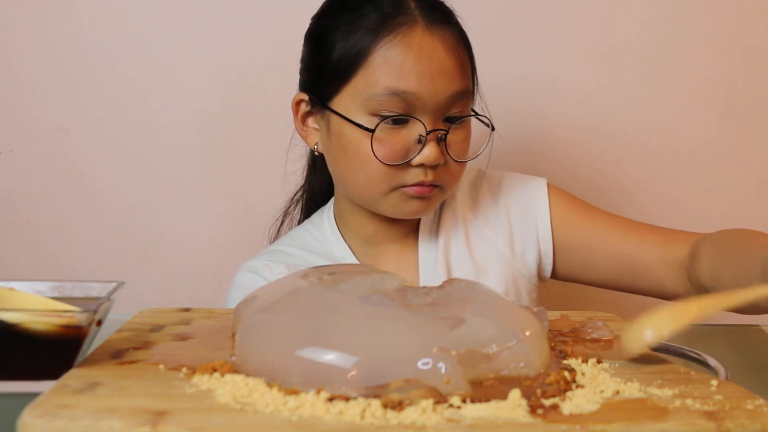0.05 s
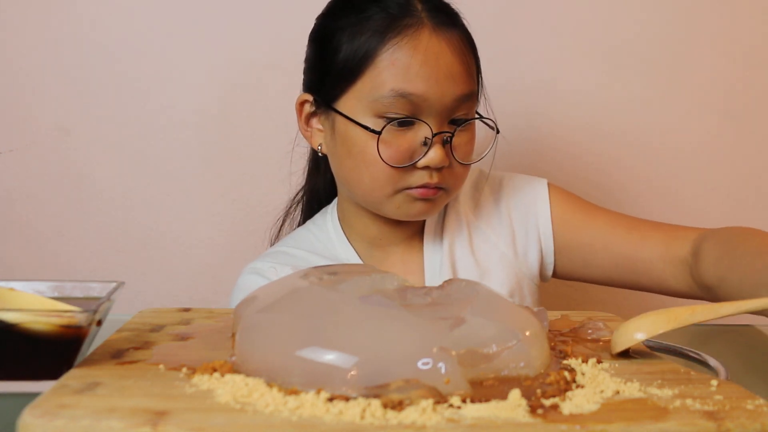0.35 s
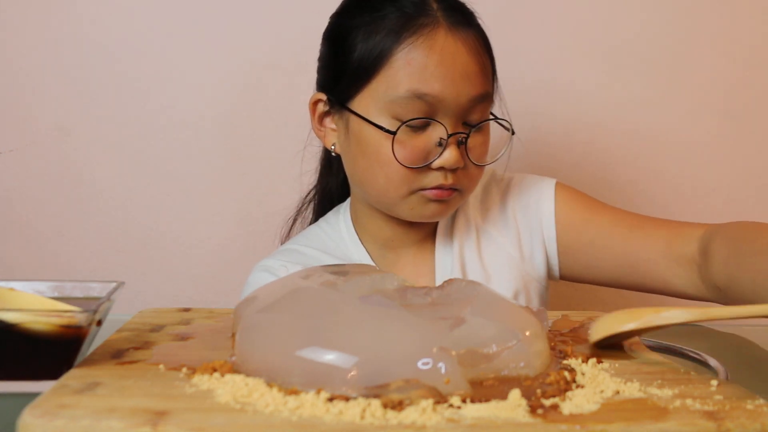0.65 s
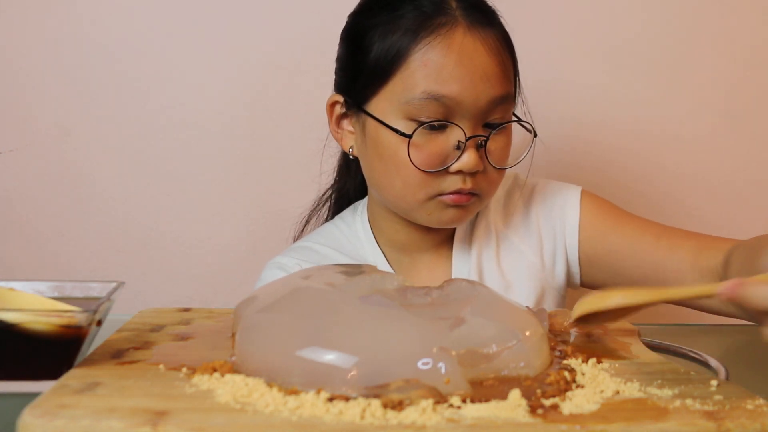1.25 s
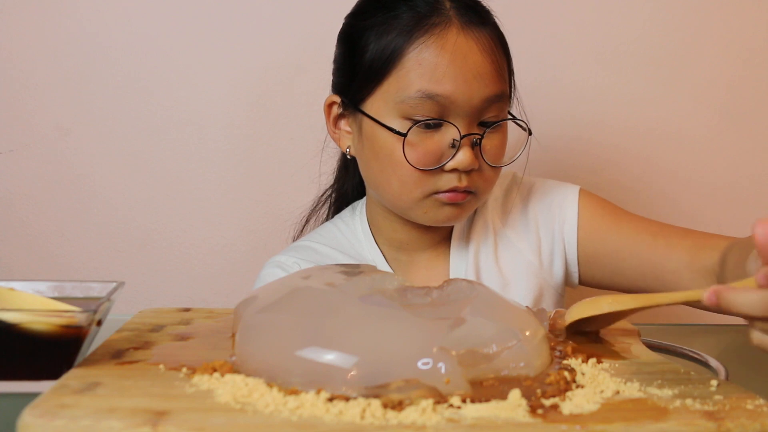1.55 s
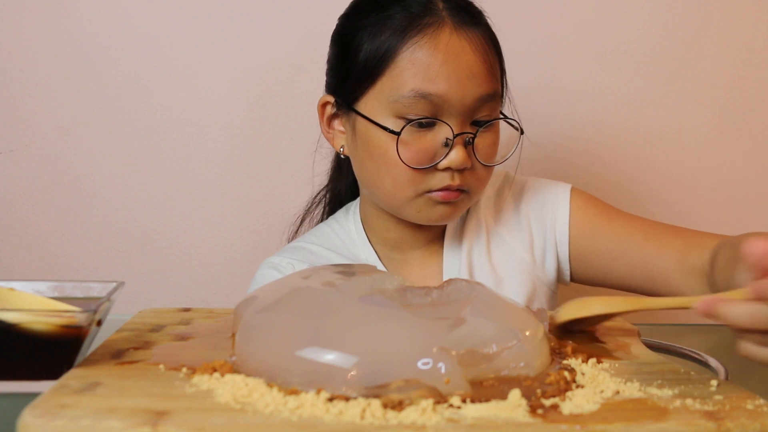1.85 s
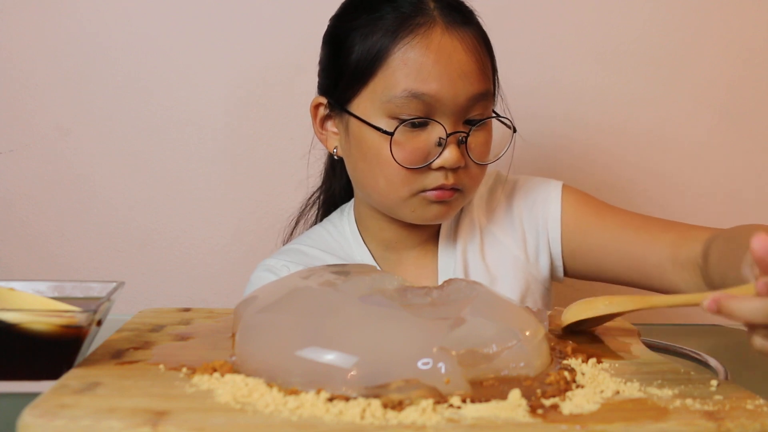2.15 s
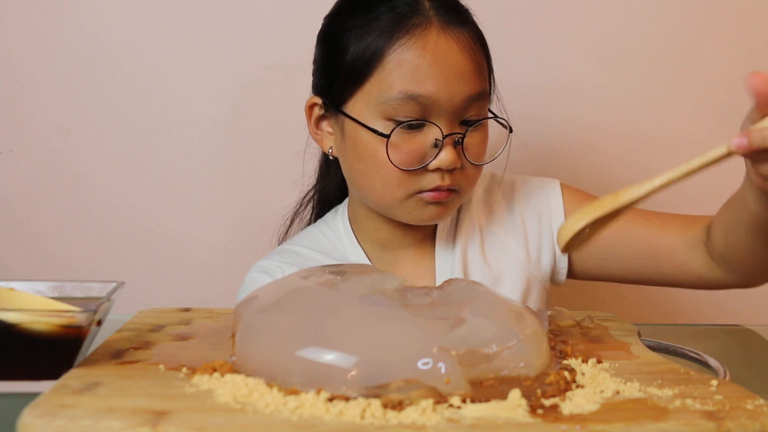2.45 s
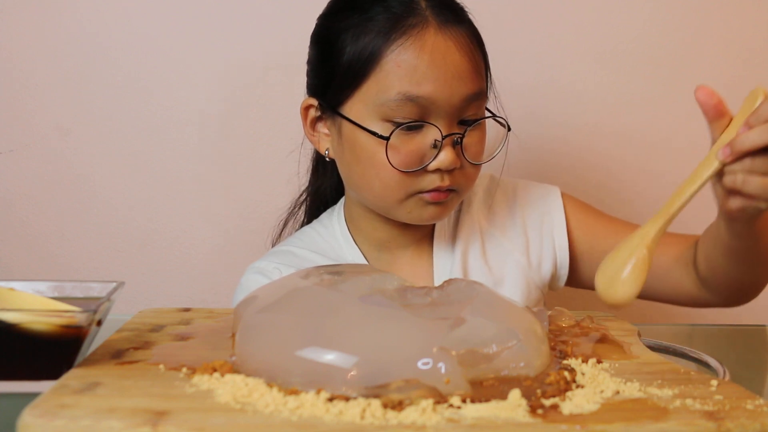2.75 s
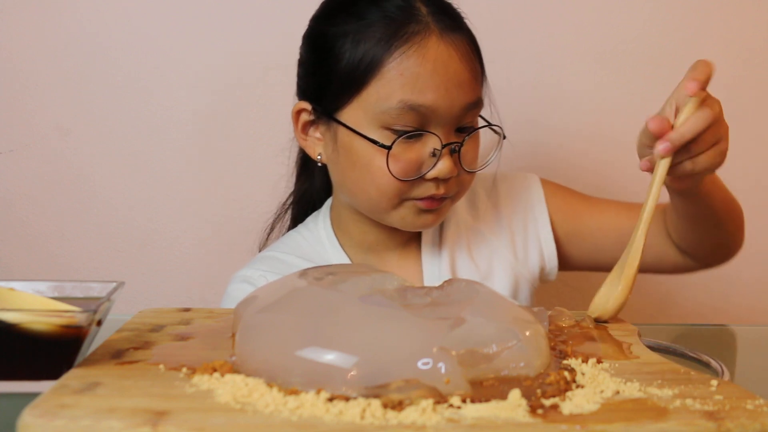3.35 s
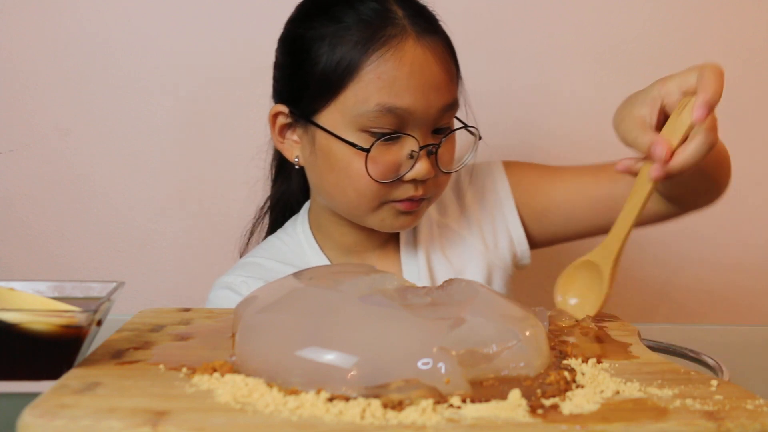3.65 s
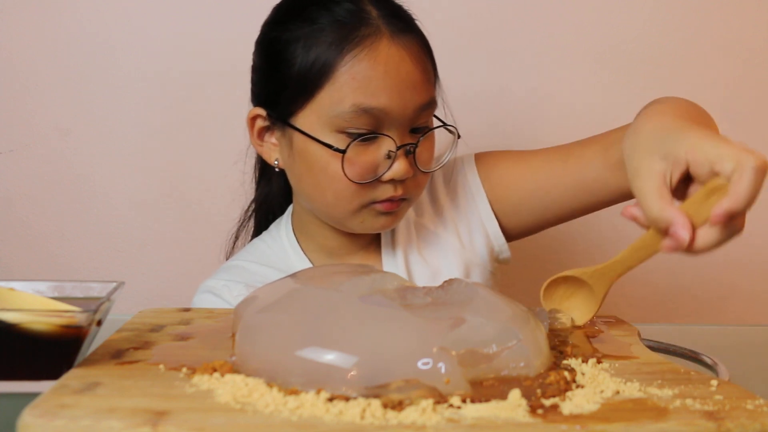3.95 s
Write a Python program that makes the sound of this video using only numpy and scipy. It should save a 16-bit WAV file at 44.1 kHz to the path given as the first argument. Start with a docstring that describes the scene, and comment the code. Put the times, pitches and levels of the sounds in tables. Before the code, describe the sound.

Close up in a small, quiet kitchen, a wooden spoon taps and rubs on a wooden board, now and then squeaking. It lifts with a soft rustle, lands with a firm knock, then makes a few faint touches.

```python
"""Wooden spoon on a wooden board

A small, quiet kitchen, microphone close, nearly mono. The spoon knocks on the board, ringing both, and
is pushed over it in short, gritty strokes that now and then stick and squeak. It is lifted with a soft
rustle, set down hard, creaks and slides in the fingers, and touches the board again. The room answers."""
import sys
import numpy as np
from scipy import signal
from scipy.fft import rfft, irfft, next_fast_len
from scipy.io import wavfile
from scipy.ndimage import uniform_filter1d, map_coordinates

SR = 44100
rng = np.random.default_rng(int(sys.argv[2]) if len(sys.argv) > 2 else 0)


def master_out(mix):
    """Clip the mix to full scale and print it as 16-bit PCM to the path in sys.argv[1]."""
    frames = np.transpose(np.atleast_2d(mix))
    ceiling = np.clip(frames, -1, 1)
    pcm = np.round(ceiling * 32767).astype(np.int16)
    wavfile.write(sys.argv[1], SR, pcm)


N = 176400

# spoon meets board: start_s, peak_db, hardness_hz, spoon_ping_db, spot_hz, spot_gain
KNOCKS = [(.1418, 0, 2550, -13.5, 1390, 1), (1.0946, -10.5, 1850, -53, 804, .4),
          (1.458, -1, 2760, -38, 2790, 1.1), (1.897, -17, 1400, -37, 1010, 1.5),
          (2.9425, -1, 1040, -25, 754, 0.5), (2.9495, -6, 1370, -47, 994, 3.5),
          (3.304, -15.5, 730, -47, 435, 0.74), (3.762, -31, 784, -52, 690, 1.1),
          (3.91, -26, 725, -37, 710, .6)]
# pushes over the board, levels ahead of the trims in scrapes(): start_s, length_s, rub_db, rumble_db, rasp_db
STROKES = [(0.643, 0.14, -35, -36, -42.5), (0.759, 0.088, -21, -49, -34), (1.128, 0.066, -22, -32, -30.5),
           (1.177, 0.045, -20, -30, -29.5), (1.227, .08, -58, -45, -59), (1.319, 0.053, -57, -49, -47),
           (1.477, 0.15, -22, -33.5, -32), (1.614, .1, -34.5, -58, -38), (1.703, 0.067, -32, -35, -36.5),
           (1.824, 0.12, -19, -35.5, -26), (1.971, 0.12, -22.5, -32.5, -30), (2.123, 0.096, -22, -32, -28),
           (3.02, 0.13, -32.5, -40, -52), (3.603, 0.15, -38, -35.5, -67), (3.914, 0.041, -42.5, -31, -51)]
# the wood sticks and slips in step: start_s, length_s, pitch_hz, relative_db
SQUEAKS = [(0.794, 0.062, 1075, -24), (1.174, 0.038, 926, -17), (1.255, 0.045, 925, -38),
           (1.848, 0.065, 1009, -14.5), (2.134, 0.048, 1052, -19.5)]
# the handle creaks in the grip: start_s, length_s, level_db
CREAKS = [(2.969, 0.005, -32), (2.9992, 0.0043, -23.5), (3.004, 0.0026, -23), (3.015, 0.0042, -23.5),
          (3.0435, .0025, -19), (3.066, .003, -32)]
# faint ticks of the spoon: start_s, peak_db
TICKS = [(2.902, -28.5), (2.91, -43), (3.0458, -17), (3.491, -36.5)]
# the handle slides through the fingers: start_s, length_s, level_db
SLIDES = [(3.177, 0.069, -43), (3.235, 0.22, -47)]
# the arm moves: start_s, length_s, level_db
RUSTLES = [(-.1, 0.31, -51), (1.254, 0.054, -46), (1.91, 0.37, -45), (2.207, 0.25, -42), (2.427, 0.13, -43),
           (2.535, .14, -44), (3.607, 0.12, -47)]
# broad, quickly damped modes of the board: pitch_hz, width_hz, gain_db
BOARD_MODES = [(310, 140, 4), (508, 124, 4), (837, 280, 9.5), (1051, 65, 5), (1253, 660, 1), (1667, 265, 2),
               (2500, 140, 7.5)]
# modes of the spoon: pitch_hz, width_hz, gain_db
SPOON_MODES = [(2590, 290, 4.5), (3670, 370, -9), (4750, 130, 3), (5070, 150, 1.5), (6280, 170, -8.5),
               (11800, 4300, -26)]
# midrange of wood rubbing on wood: frequency_hz, relative_db
RUB_SPECTRUM = [(150, -37), (340, -12.5), (500, -8.5), (750, -5), (940, 0), (1080, -3), (1260, -5),
                (1500, -12), (1800, -13), (2200, -26), (3000, -48), (6000, -32)]
# low rumble under a stroke: frequency_hz, relative_db
RUMBLE_SPECTRUM = [(70, -67), (160, -12), (300, -1.5), (500, 0.5), (750, -7.5), (1500, -48)]
# dry rasp on top of a stroke: frequency_hz, relative_db
RASP_SPECTRUM = [(1200, -19), (2150, -9), (2600, 0.5), (3300, -4), (4100, -14.5), (4800, -13), (5700, -24),
                 (6700, -19), (8000, -28), (11200, -36), (12400, -27), (13500, -40)]
# fingers on the handle: frequency_hz, relative_db
FINGER_SPECTRUM = [(2500, -47), (4300, -18), (4850, -1.5), (5500, -23), (6800, -19), (8500, -18.5),
                   (11000, -29), (16000, -29)]
# cloth on the moving arm: frequency_hz, relative_db
CLOTH_SPECTRUM = [(600, -13), (1500, -7.5), (2600, 2.5), (4500, -4.5), (6200, -2), (9500, -11),
                  (12000, -19.5), (16000, -29)]
# echoes off the table and near surfaces: delay_s, gain
NEAR_ECHOES = [(.0023, 0.088), (.004, 0.09), (.0062, 0.36), (.0074, 0.19), (.0102, 0.42), (0.0128, 0.22)]
# lingering resonances of table and kitchen: pitch_hz
LINGER_HZ = [152, 312, 363, 476, 509, 675, 755, 788, 927, 1046, 1212, 1279, 1452, 1644, 1771]
# strength of each of those resonances: gain_db
LINGER_DB = [1, 2, 2, 6, 5, 2, 3, 3, 7, 6, 4, 4, 0, 1, 1]
# time the kitchen takes to die away by 60 dB: frequency_hz, decay_s
ROOM_DECAY = [(200, 0.98), (550, 0.88), (1400, 0.32), (3700, .38), (12000, 0.083)]
# room tone of the kitchen: frequency_hz, relative_db
ROOM_TONE_SPECTRUM = [(15, -41), (25, -19), (184, 0.5), (228, 0.5), (291, -3), (382, -1.5), (672, -8.5),
                      (729, -10), (881, -8.5), (1090, -11), (1180, -12.5), (1430, -16), (1930, -17),
                      (2590, -17), (4570, -20.5), (5980, -21.5), (15800, -30.5)]
# microphone hiss: frequency_hz, relative_db
HISS_SPECTRUM = [(100, 6), (600, -7), (2500, -13), (5000, -7.5), (9000, 4.5), (16000, 5.5)]


def knocks(spot_width_hz=170, bass_cut_hz=240, bend_delay_s=0.000502):
    """Each knock thumps the board, coloured by the spot it strikes; the board radiates little bass."""
    out = np.zeros(N)
    for start_s, peak_db, hardness_hz, _, spot_hz, spot_gain in KNOCKS:
        def struck_board(hz):
            spot = 1 + spot_gain * modes([(spot_hz, spot_width_hz, 0)], hz)
            # bending waves reach the edge after bend_delay_s at 1 kHz, the bass later still
            travel = np.exp(-4j * np.pi * bend_delay_s * np.sqrt(1000 * hz))
            radiation = (1j * hz / (bass_cut_hz + 1j * hz)) ** 2
            return board(hz) * spot * travel * radiation
        out += amp(peak_db) * strike(start_s, struck_board, hardness_hz)
    return out


def pings(lag_s=0.00071):
    """Each knock also rings the spoon, briefly: the hand damps it."""
    return sum(amp(ping_db) * strike(start_s + lag_s, spoon, hardness_hz=5600)
               for start_s, _, _, ping_db, _, _ in KNOCKS)


def strike(start_s, body, hardness_hz):
    """One contact rings a body, at peak 1; softer contacts lose the treble."""
    softening = signal.butter(3, hardness_hz, fs=SR, output="sos")
    push = signal.sosfilt(softening, signal.unit_impulse(SR // 10))
    ring = filtered(push, body)
    return np.pad(ring / np.abs(ring).max(), (round(start_s * SR), N))[:N]


def board(hz):
    """Response of the board's modes."""
    return modes(BOARD_MODES, hz)


def spoon(hz):
    """Response of the spoon's modes."""
    return modes(SPOON_MODES, hz)


def scrapes(rub_trim_db=-6, rumble_trim_db=-5, rasp_trim_db=-4, uneven_db=1.05):
    """Slips drive the board's modes, with a rumble below and a dry rasp above."""
    rub = amp(rub_trim_db) * coloured(filtered(slips(), board), RUB_SPECTRUM)
    rumble = amp(rumble_trim_db) * coloured(slips(), RUMBLE_SPECTRUM)
    rasp = amp(rasp_trim_db) * coloured(slips(), RASP_SPECTRUM)
    out = np.zeros(N)
    for start_s, length_s, rub_db, rumble_db, rasp_db in STROKES:
        grit = amp(rub_db) * rub + amp(rumble_db) * rumble + amp(rasp_db) * rasp
        out += swell(start_s, length_s) * grit
    return out * amp(uneven_db * wobble(65))


def slips(per_s=2600, spread_db=5):
    """Dense tiny catches of wood on wood, uneven in size."""
    catches = rng.random(N) < per_s / SR
    sizes = amp(spread_db * rng.standard_normal(N))
    return catches * sizes * rng.choice([-1, 1], N)


def squeaks(waver=0.029, overtone_db=-22):
    """For a moment the slips lock to a resonance and make a rough tone."""
    phase_per_hz = 2 * np.pi * np.cumsum(1 + waver * wobble(250)) / SR
    out = np.zeros(N)
    for start_s, length_s, pitch_hz, relative_db in SQUEAKS:
        phase = pitch_hz * phase_per_hz
        tone = np.sin(phase) + amp(overtone_db) * np.sin(3 * phase)
        out += amp(relative_db) * swell(start_s, length_s) * tone
    return out / 2


def handling():
    """The handle creaks, ticks and slides as the fingers take a new grip."""
    creaks = swells(CREAKS) * unit_rms(filtered(rng.standard_normal(N), spoon))
    ticks = sum(amp(peak_db) * strike(start_s, spoon, hardness_hz=3740) for start_s, peak_db in TICKS)
    slides = swells(SLIDES) * coloured(rng.standard_normal(N), FINGER_SPECTRUM)
    return creaks + ticks + slides


def rustle(flutter_db=-1.2):
    """A faint brushing of cloth as the arm moves."""
    flutter = amp(flutter_db * wobble(60))
    return swells(RUSTLES) * flutter * coloured(rng.standard_normal(N), CLOTH_SPECTRUM)


def kitchen(x, linger_width_hz=11.3, echo_cut_hz=2250, tail_db=-2):
    """What reaches the microphone: direct sound, dull near echoes, lingering resonances, diffuse tail."""
    lingering = [(hz, linger_width_hz, db) for hz, db in zip(LINGER_HZ, LINGER_DB)]

    def near_field(hz):
        echoes = sum(gain * np.exp(-2j * np.pi * hz * delay_s) for delay_s, gain in NEAR_ECHOES)
        return 1 + modes(lingering, hz) + echoes / (1 + (hz / echo_cut_hz) ** 4)
    return filtered(x, near_field) + amp(tail_db) * room_tail(x)


def room_tail(x, build_s=0.001):
    """Diffuse reverberation of the kitchen, even in colour; the bass lasts longest."""
    length = SR // 2
    hz, t, noise = signal.stft(rng.standard_normal(length), SR, nperseg=256)
    decay = amp(-60 * t / curve_at(ROOM_DECAY, hz)[:, None])
    spectrum = rfft(signal.istft(noise * decay, SR, nperseg=256)[1], SR)
    colour = np.sqrt(np.abs(uniform_filter1d(np.abs(spectrum) ** 2, size=25)))
    build_up = 1 - np.exp(-(np.arange(length) / SR / build_s) ** 2)
    impulse = irfft(spectrum / colour)[:length] * build_up
    return signal.fftconvolve(x, impulse / np.linalg.norm(impulse))[:N]


def background(room_tone_db=-42.5, drift_db=0.3, hiss_db=-60):
    """Steady room tone in the centre, with separate microphone hiss on each side."""
    level = amp(room_tone_db + drift_db * wobble(5.25))
    room_tone = level * coloured(rng.standard_normal(N), ROOM_TONE_SPECTRUM)
    hiss = amp(hiss_db) * coloured(rng.standard_normal((2, N)), HISS_SPECTRUM)
    return room_tone + hiss


def amp(db):
    return 10 ** (np.asarray(db) / 20)


def unit_rms(x):
    return x / np.sqrt(np.mean(x ** 2) + 1e-20)


def curve_at(points, hz):
    """Interpolate (frequency_hz, value) points on a log frequency axis."""
    point_hz, values = np.transpose(points)
    return np.interp(np.log(hz + 1), np.log(point_hz + 1), values)


def filtered(x, response):
    """Pass x through a complex response of frequency."""
    length = x.shape[-1]
    padded = next_fast_len(length + SR // 2)
    hz = np.fft.rfftfreq(padded, 1 / SR)
    return irfft(rfft(x, padded) * response(hz), padded)[..., :length]


def coloured(x, spectrum):
    """Shape x by a spectrum, at rms 1."""
    return unit_rms(filtered(x, lambda hz: amp(curve_at(spectrum, hz))))


def modes(table, hz):
    """Summed response of damped resonances."""
    return sum(amp(gain_db) * 1j * hz * width_hz / (pitch_hz ** 2 - hz ** 2 + 1j * hz * width_hz)
               for pitch_hz, width_hz, gain_db in table)


def swell(start_s, length_s, rise_share=0.35, roundness=0.89):
    """A rounded rise and fall."""
    corners_s = [start_s, start_s + length_s * rise_share, start_s + length_s]
    arc = np.interp(np.arange(N) / SR, corners_s, [0, 1, 2])
    return np.abs(np.sin(arc * np.pi / 2)) ** roundness * (arc > 0) * (arc < 2)


def swells(events):
    """An envelope with one swell for each event."""
    return sum(amp(level_db) * swell(start_s, length_s) for start_s, length_s, level_db in events)


def wobble(knots_per_s):
    """A smooth random curve."""
    knots = rng.standard_normal(int(N * knots_per_s / SR) + 4)
    return map_coordinates(knots, [np.arange(N) * knots_per_s / SR])


def scene(hand_tail_db=-9):
    """Board sounds fill the kitchen; the small sounds of spoon and hand stay drier."""
    hand = pings() + handling() + rustle()
    wood = kitchen(knocks()) + kitchen(scrapes() + squeaks())
    return wood + hand + amp(hand_tail_db) * room_tail(hand) + background()


def record(dry, top_hz=16000):
    """The recorder clips at full scale and keeps nothing above its band limit."""
    return filtered(np.clip(dry, -1, 1), lambda hz: hz < top_hz)


dry = scene()
out = record(dry)
master_out(out)
```